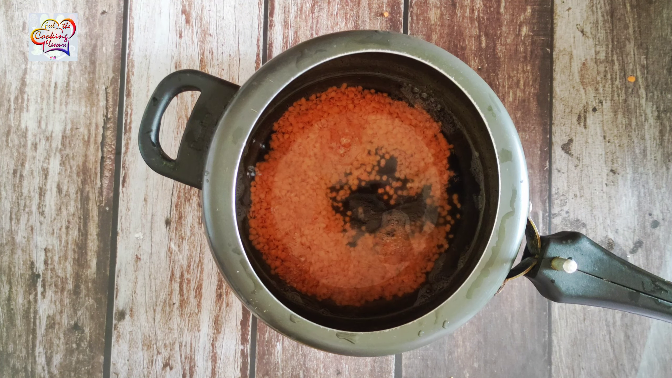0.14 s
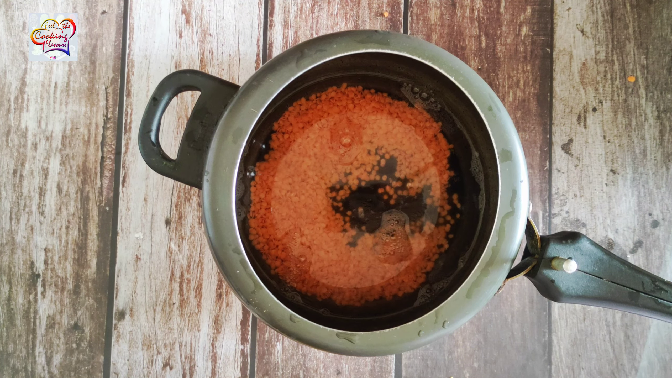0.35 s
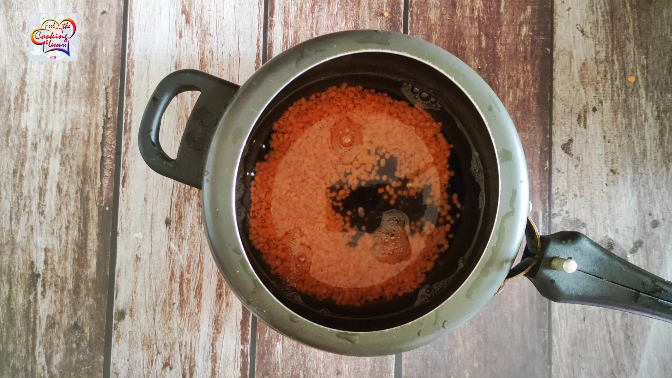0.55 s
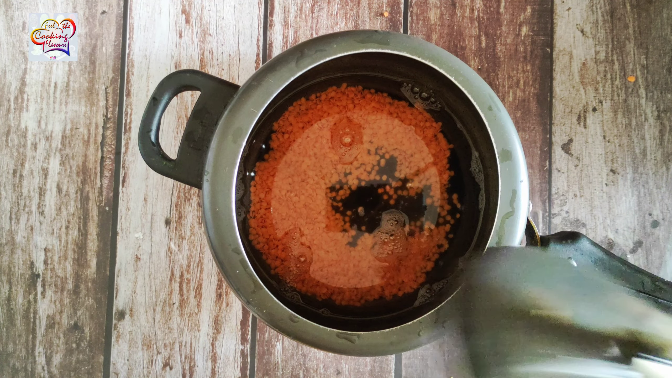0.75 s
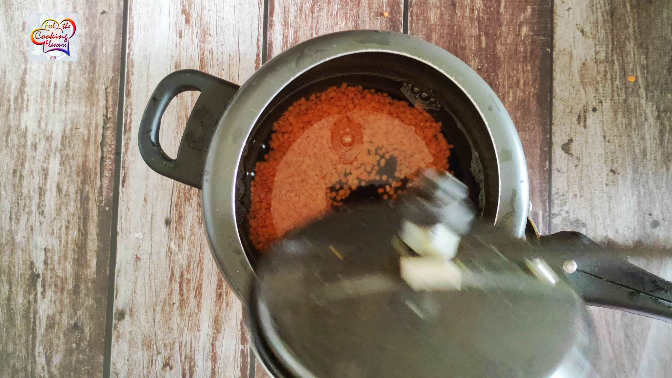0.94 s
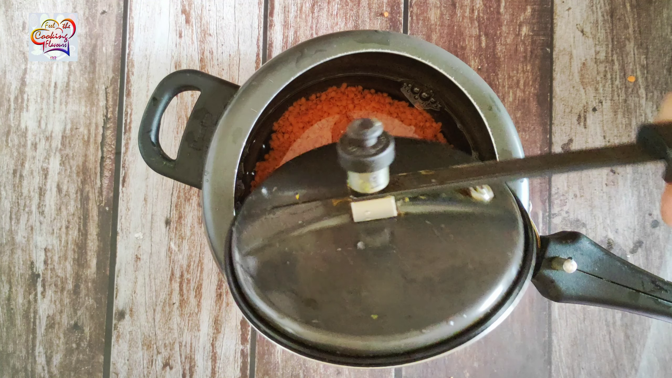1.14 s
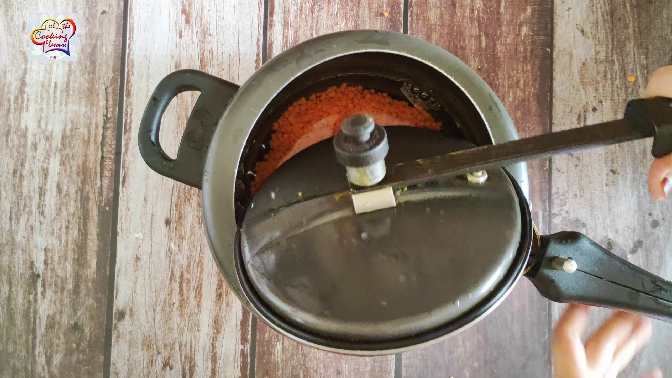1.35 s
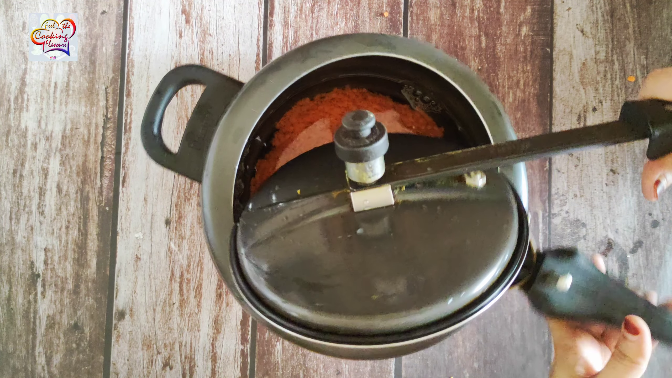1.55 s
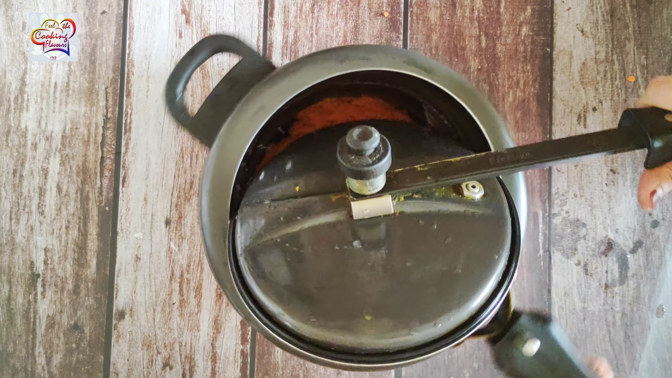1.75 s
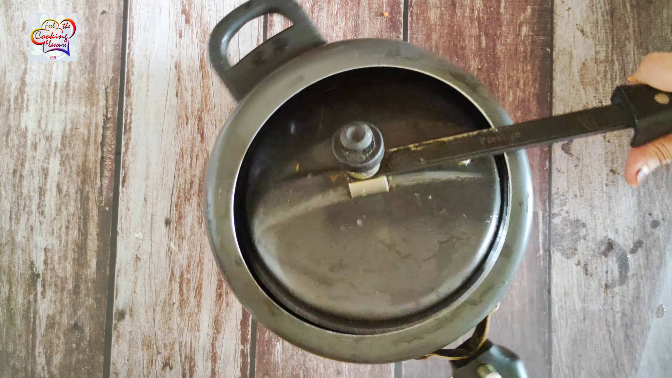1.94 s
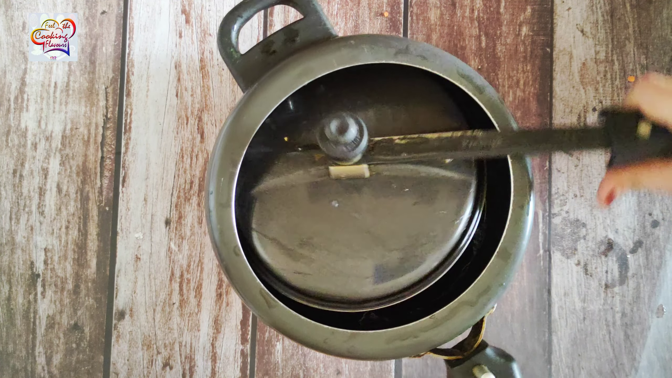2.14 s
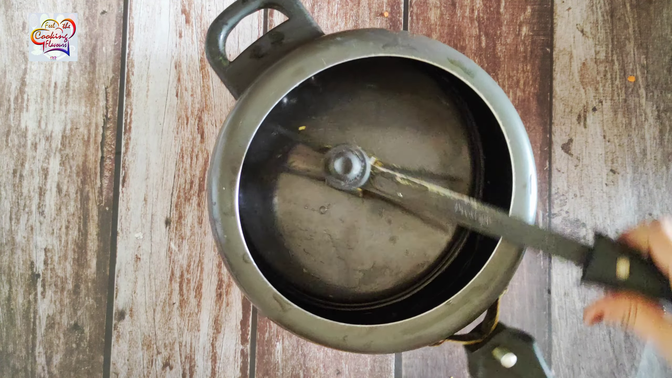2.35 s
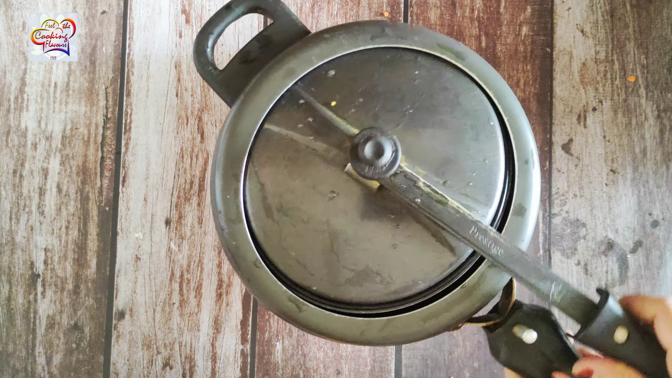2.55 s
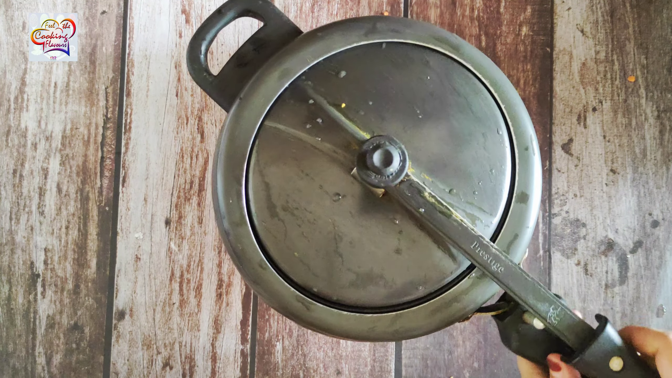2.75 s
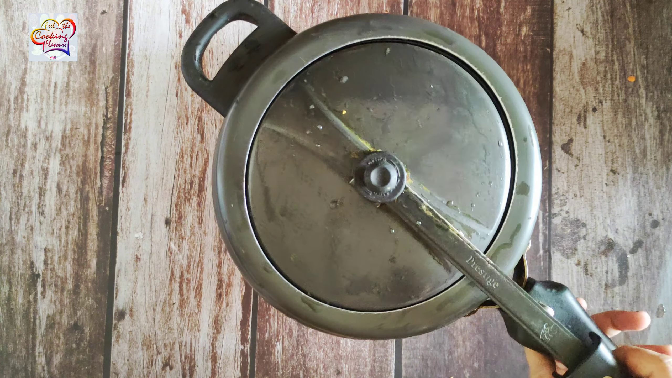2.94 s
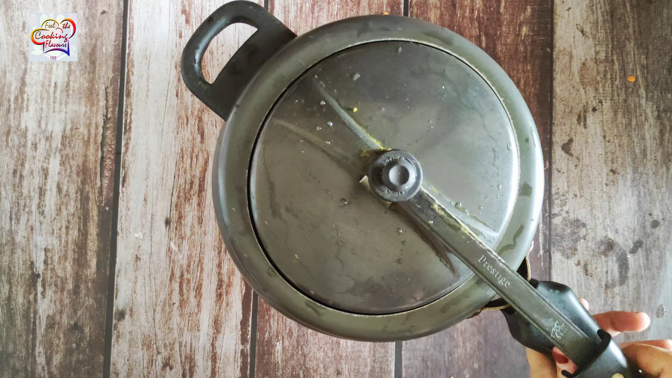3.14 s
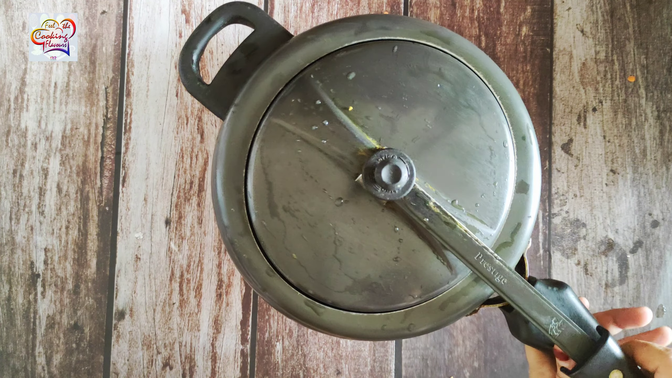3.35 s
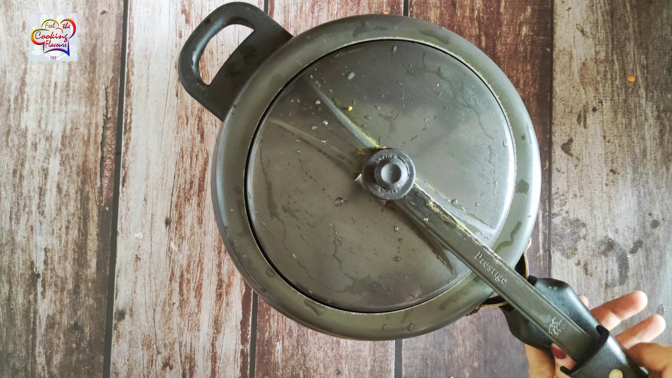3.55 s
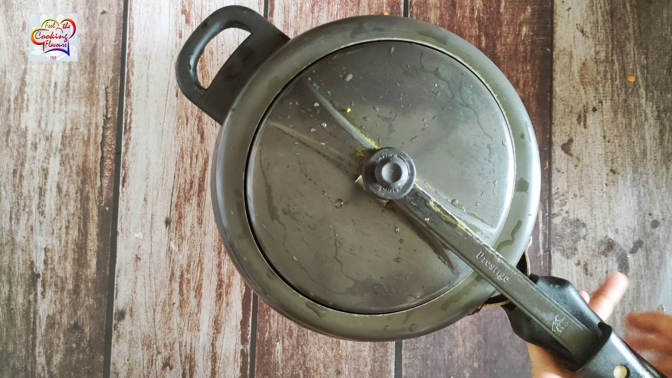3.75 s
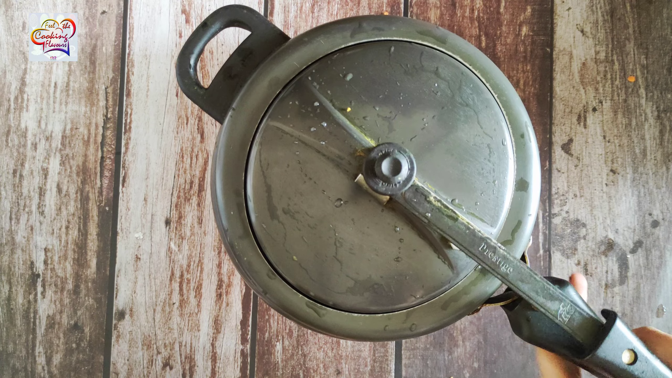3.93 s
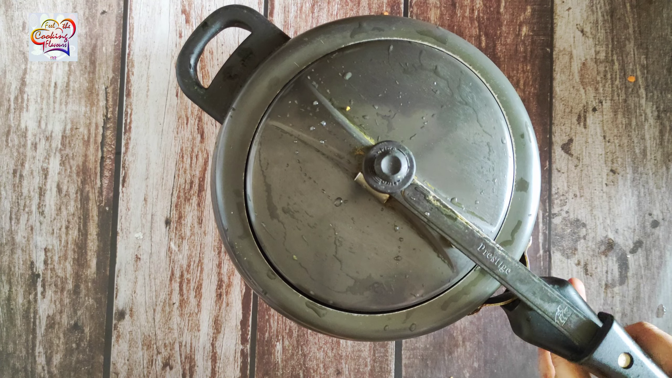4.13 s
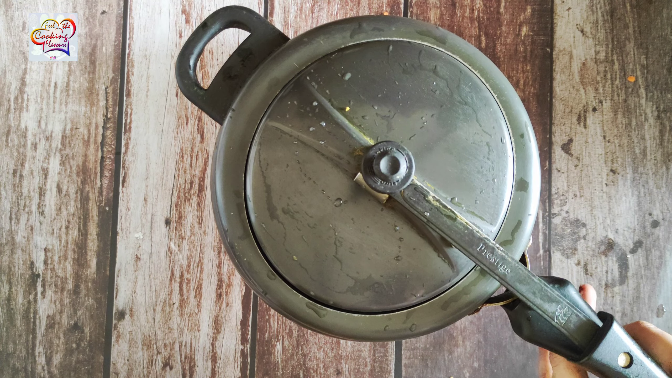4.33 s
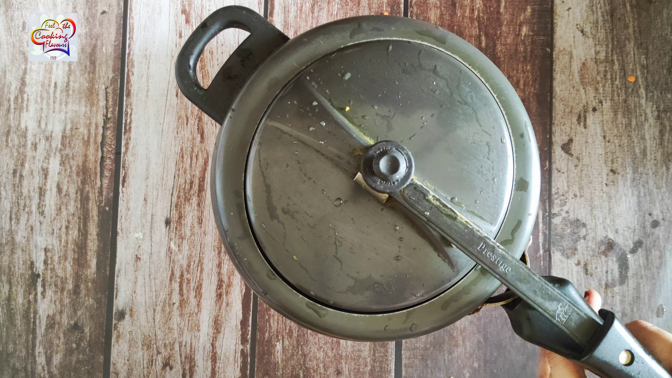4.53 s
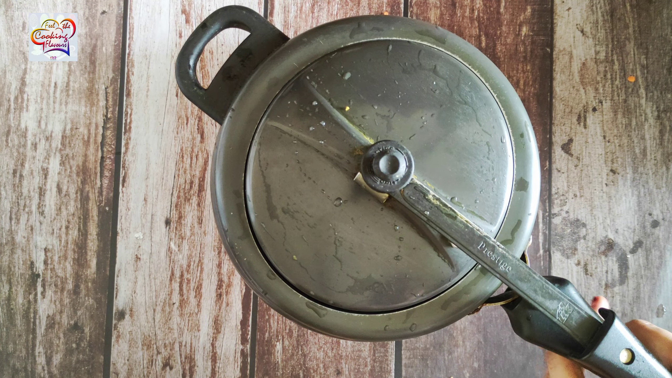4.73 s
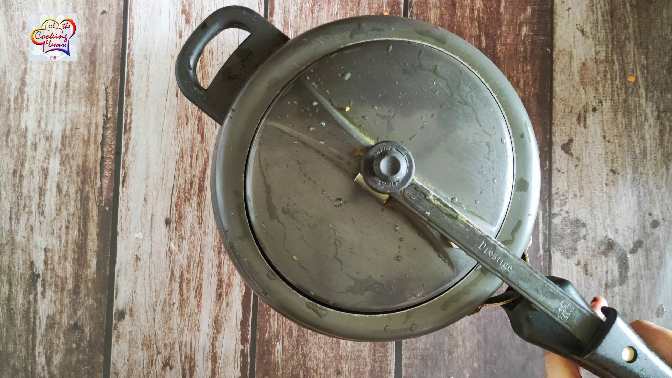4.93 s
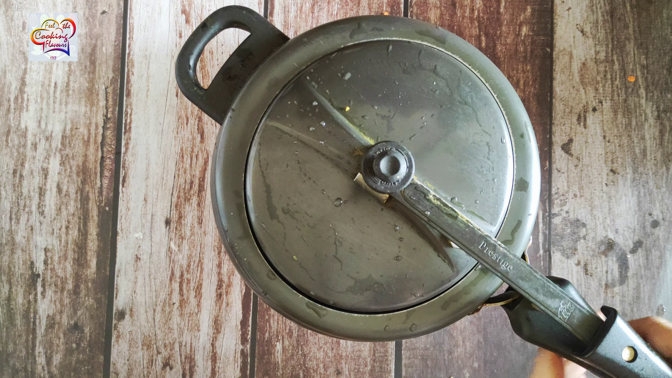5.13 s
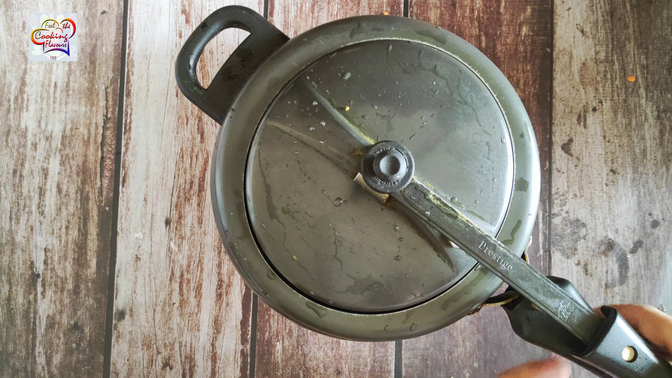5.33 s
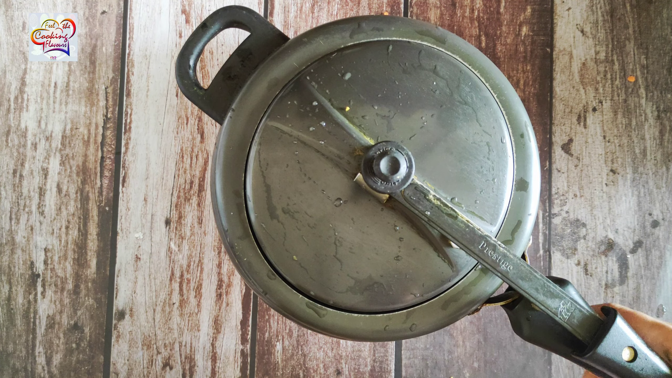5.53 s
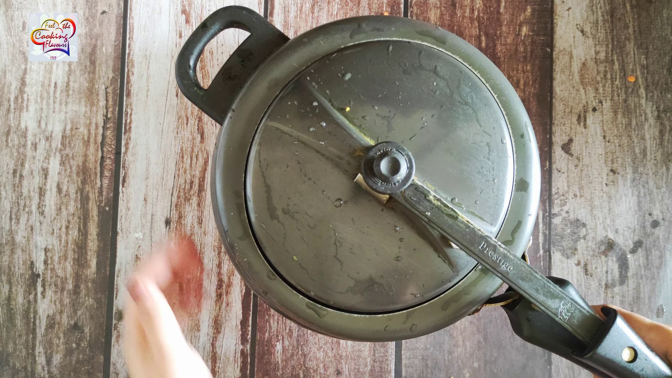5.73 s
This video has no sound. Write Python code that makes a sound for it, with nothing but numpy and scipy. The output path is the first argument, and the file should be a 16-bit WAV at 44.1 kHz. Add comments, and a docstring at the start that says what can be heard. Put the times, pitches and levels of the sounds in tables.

```python
"""In a small kitchen a metal lid is slid into a pressure cooker, turned, pulled up to the rim and latched.
Contacts excite wall and lid resonances, and the air inside booms at a pitch that falls as the gap closes.
Loose parts jingle, friction grains scrape the rim, dry clicks work the handles, low rings bump the table.
Decaying noise echoes answer over a low rumble and faint hiss; the sound is cut briefly near the start,
and dips once later."""
import sys
import numpy as np
from scipy import signal
from scipy.fft import rfft, irfft, next_fast_len
from scipy.io import wavfile
from scipy.ndimage import uniform_filter1d, map_coordinates

SR = 44100
rng = np.random.default_rng(int(sys.argv[2]) if len(sys.argv) > 2 else 0)


def volts(x):
    """Linear amplitude factor 10**(x/20) for a level x in dB, scalar or array-like."""
    e = np.asarray(x, float) / 20
    return 10 ** e


def output_pcm(signal):
    """Save a mono or channel-first signal as 16-bit PCM at the path in sys.argv[1].

    Samples are clipped to [-1, 1] before scaling.
    """
    pcm = np.clip(np.atleast_2d(signal).T, -1, 1) * 32767
    wavfile.write(sys.argv[1], SR, np.round(pcm).astype(np.int16))


N = 259308  # length in samples
SPLIT_HZ = 3990  # bright ticks lie above, duller layers below

# Levels of events and resonances are balances ahead of the layer trims.
# Room rumble colour: [f/Hz, relative gain/dB]
RUMBLE_COLOUR = [(21, -39), (35, -6.5), (54, -1), (70, -17), (156, -1), (191, 0), (210, -12.5), (242, -1.5),
                 (388, -12.5), (548, -12.5), (683, -21.5), (951, -23), (1500, -33), (1950, -46),
                 (3300, -120)]
# Room rumble over time: [t/s, rms level/dB]
RUMBLE_LEVEL = [(0, -61.5), (1, -63.5), (3.5, -59), (4.4, -63.5), (5.3, -61.5), (5.88, -62.5)]
# Faint hiss colour: [f/Hz, relative gain/dB]
HISS_COLOUR = [(710, -51), (1200, -12), (2620, -11.5), (2920, -14.5), (4310, -19), (4550, -13),
               (5020, -19.5), (7330, -7), (9510, -20), (16000, -52.5)]
# Loose parts jingle as the lid is carried: [t/s, blow level/dB, then knock and ring relative to it/dB]
JINGLES = [(0.191, -65.5, -3, -10), (0.4622, -56.5, -27, -3), (0.637, -69, 3, 6), (0.671, -49, 3.4, -3.5),
           (0.756, -66.5, 0, 7), (0.832, -42, -2.5, -27), (0.841, -44.5, -32, -9),
           (0.866, -21.5, -21.5, -11)]
# Resonances of the lid held free: [f/Hz, width/Hz, level/dB]
FREE_LID_MODES = [(2245, 260, -10.5), (2570, 230, 2), (2640, 260, -7), (3570, 93, -3.5), (4680, 180, -16),
                  (5200, 230, -14.5)]
# Click colour of small hard parts: [f/Hz, relative gain/dB]
SNAP_COLOUR = [(2060, -59), (3500, -0.5), (3880, -16), (4680, -19.5), (5570, -11.5), (7600, 2.5),
               (8590, -7.5), (10500, -33), (15700, -30), (16400, -26.5)]
# The pot is turned on the table: [start t/s, hold t/s, level/dB]
DRAGS = [(1.0, 0.02, -65), (1.65, 0.13, -59), (2.15, 0.27, -63)]
# The pot bumps the wooden table: [t/s, ring level before its swell/dB, f/Hz, rumble level after it/dB]
BUMPS = [(1.29, -28, 220, -44), (1.402, -38, 175, -52), (1.712, -31.5, 180, -57), (1.871, -28, 119, -52),
         (1.905, -29, 124, -53), (2.6, -17.5, 250, -41), (2.748, -22, 193, -41), (2.783, -14, 175, -43.5),
         (2.82, -21.5, 148, -60), (2.942, -18, 147, -44.5), (2.987, -31, 169.9, -48),
         (3.138, -33, 171, -46), (3.388, -28.5, 166, -55), (3.537, -41, 148, -67), (3.942, -30, 179, -59),
         (4.79, -35, 114, -78)]
# Resonances of the table top: [f/Hz, width/Hz, level/dB]
TABLE_MODES = [(61.16, 10, -6.5), (139.6, 36.8, 2), (175, 30, 2), (250, 65, -4)]
# Lid on pot: [t/s, blow level/dB, then boom, ring and clack relative to it/dB]
CONTACTS = [(1.284, -34, 4, 9, 1), (1.296, -32.5, -29, 3, -19), (1.3178, -52, 18, 15.5, -22),
            (1.394, -43.5, 8, 12.5, -0.5), (1.708, -56.5, 6, 4, -7), (1.7666, -45, -13, -6, -1),
            (1.7914, -34, -40, -3, -9), (1.8344, -43.5, 0, 3.5, 0), (1.8569, -39.5, 3.5, 6, -3),
            (1.8667, -30.5, -19, -26, -14), (1.9086, -33.5, 1, -14, -2.5), (1.9294, -51.5, -9.5, -25, 6),
            (1.9654, -32.5, -10, -7, -11), (2.139, -35, -14.5, -3, -4), (2.2204, -25.5, -16, -3, -2.5),
            (2.2393, -21, -14, -9, -7), (2.2694, -30.5, -7, -11, -3), (2.3297, -23.5, -14.5, -4.5, -8.5),
            (2.3993, -37.5, -5, 2, 0), (2.4453, -27, -37, -8, -16), (2.4544, -32.5, -6.5, -6, 1.5),
            (2.4894, -38.5, -17, 2, -4.5), (2.5365, -45, -26, 2.5, 4.5), (2.585, -26.5, -6.5, -5, -3.5),
            (2.5994, -27.5, -23, -16, -4), (2.6194, -23.5, -13, -5, -8), (2.6365, -25, -14, -10.5, -2.5),
            (2.6669, -27, -9.5, -4.5, -9), (2.7358, -33, -15, -0.5, -3.5), (2.7539, -31.5, -1, -15, -0.5),
            (2.9809, -28, -7, -0.5, -5), (3.0181, -34, -8, -5, -9), (3.136, -42, -24, 9.5, -4)]
# Resonances of the pot wall: [f/Hz, width/Hz, level/dB]
WALL_MODES = [(546, 51, -7), (592.5, 75, -4.5), (846, 46, -4), (971, 58, 1), (1001, 50, 1)]
# Resonances of lid and rim: [f/Hz, width/Hz, level/dB]
LID_MODES = [(1580, 49, -10), (2034, 36, 1.5), (2910, 37, -1), (3570, 24, 14), (3700, 112, 11),
             (4555, 30, 10.5), (5270, 46, 11), (5200, 50, -9)]
# Colour of the contact crack: [f/Hz, relative gain/dB]
CRACK_COLOUR = [(1760, -43), (3000, -20.5), (3690, -8), (4040, -11.5), (4830, -2.5), (5570, -5.5),
                (7340, 2.5), (8770, -5.5), (10600, -29.5), (14700, -34.5), (16400, -54)]
# Colour of the lid's clack: [f/Hz, relative gain/dB]
CLACK_COLOUR = [(1200, -7.5), (1500, 2), (2100, 1.5), (2600, 1.5), (3100, -5), (3600, 8), (4100, -0.5),
                (4700, 15)]
# Lid tilted in, hanging free, then pulled up: [t/s, air f/Hz, air t60/s, main lid ring f/Hz, its t60/s]
LID_POSITION = [(1.3, 380.7, 0.064, 793.5, 0.11), (1.8, 391, 0.067, 799, 0.083),
                (1.95, 347, .05, 794, 0.07), (2.13, 322.8, 0.26, 765, 0.46), (2.3, 323, 0.3, 771, .13),
                (2.5, 325.7, 0.16, 770.3, 0.099), (2.55, 318.8, 0.054, 769.6, 0.075),
                (2.62, 318.2, 0.095, 768.7, 0.12), (2.68, 253.6, 0.22, 769, 0.22),
                (2.74, 245.3, 0.086, 760, 0.049), (2.8, 228.2, .085, 768, 0.059),
                (3.0, 250, 0.041, 768, 0.06)]
# Rim sliding on rim: [start t/s, rise t/s, hold t/s, scrape level/dB, brightness relative to it/dB]
SLIDES = [(1.637, .13, .19, -46.5, -6), (2.5, 0.084, 0.082, -35.5, -3.5), (2.713, 0.073, 0.014, -39, -2),
          (3.09, 0.036, 0.016, -44.5, -4.5)]
# Small parts of the handles: [t/s, blow level/dB, then knock and clack relative to it/dB]
CLICKS = [(3.1675, -33.5, -45, -7), (3.188, -27, -13.5, -4), (3.533, -60.5, -10, -5),
          (3.647, -53.5, -5.5, -25), (3.743, -64.5, 8.5, -18), (3.9932, -43, -16, -6.5),
          (4.0049, -29.5, -20.5, -14), (4.0511, -35, -13.5, -14), (4.1163, -54, 8, -26),
          (4.139, -36, -12, -15.5), (4.334, -48, -10.5, -31), (4.341, -41, -14.5, -17),
          (4.5444, -39.5, -15.5, -10), (4.781, -20, -19, -16), (4.9352, -37, -16.5, -14.5),
          (5.008, -64, 5, -27)]
# Decay of the kitchen's main echo: [f/Hz, t60/s]
KITCHEN_DECAY = [(150, 0.66), (500, 0.33), (1500, 0.41), (4000, 0.47), (8000, 0.39), (14000, 0.26)]
# Strength of the kitchen's answer: [f/Hz, gain/dB]
ECHO_COLOUR = [(100, -12.5), (400, 1.5), (1200, -2), (4000, -1.5), (9000, -1.5)]


def unit(x):
    """Bring a signal to rms 1."""
    return x / np.sqrt(np.mean(x ** 2) + 1e-20)


def along(points, hz):
    """Read a (frequency, value) curve on a log frequency axis."""
    f, v = np.transpose(points)
    return np.interp(np.log(hz + 1), np.log(f + 1), v)


def curves(rows):
    """Give one value per sample for each column after the time."""
    s, *cols = np.transpose(rows)
    return [np.interp(np.arange(N) / SR, s, c) for c in cols]


def filtered(x, response):
    """Shape a sound's spectrum by a complex response of frequency."""
    m = 2 * next_fast_len(N // 2 + SR // 4)
    return irfft(rfft(x, m) * response(np.fft.rfftfreq(m, 1 / SR)), m)[..., :N]


def causal(gain):
    """Turn a gain curve into a minimum-phase response of unit energy, so nothing sounds ahead of its blow."""
    cep = irfft(np.log(gain + 1e-6))
    # fold the cepstrum onto positive time
    cep[1:len(cep) // 2] *= 2
    cep[len(cep) // 2 + 1:] = 0
    response = np.exp(rfft(cep))
    return response / np.sqrt(np.mean(np.abs(response) ** 2))


def modes(table, hz):
    """Sum damped resonances of alternating sign into a response of unit energy."""
    total = 0
    for k, (centre, width, db) in enumerate(table):
        damping = 1j * hz * width
        total = total + (-1) ** k * volts(db) * damping / (centre * centre - hz * hz + damping)
    return total / np.sqrt(np.mean(np.abs(total) ** 2))


def chatter(length, rise, spike):
    """A contact force of set energy: a first blow, then a rattle that swells fast and dies away (times in s)."""
    t = np.arange(SR // 10) / SR
    shape = np.exp(-t / length) * (1 - np.exp(-t / rise))
    force = rng.standard_normal(len(t)) * shape
    force *= np.linalg.norm(shape) / np.linalg.norm(force)
    force[int(rise * SR)] += spike
    return force


def clack(force, hz, width):
    """The struck spot favours its own pitch: one resonance, its width a fraction of that pitch."""
    b, a = signal.iirpeak(hz, 1 / width, SR)
    return signal.lfilter(b, a, force) / np.sqrt(width * hz / SR)


def spot(hz):
    """Each blow lands on another spot, with another pitch."""
    return hz * np.exp(np.clip(0.21 * rng.standard_normal(), -.7, .7))


def snap(force):
    """The bright tick of a small hard part: its colour, kept above the split."""
    return filtered(force, lambda hz: causal(volts(along(SNAP_COLOUR, hz)) / (1 + (SPLIT_HZ / (hz + 1)) ** 8)))


def stroke(start, hold, db, rise, t60):
    """Gain of one movement: a smooth rise, a hold, a dying release (times in s)."""
    t = np.arange(N) / SR - start
    release = volts(db - 60 * np.clip(t - rise - hold, 0, 2) / t60)
    return release * np.clip(t / rise, 0, 1) ** 2


def room_noise():
    """Low rumble whose noise is slightly patchy in time and pitch, and a faint smooth hiss."""
    z = signal.stft(rng.standard_normal(N), nperseg=1024)[2]
    patches = uniform_filter1d(uniform_filter1d(rng.standard_normal(z.shape), 6, 0), 8, 1)
    noise = signal.istft(z * volts(2.1 * unit(patches)), nperseg=1024)[1][:N]
    level_db, = curves(RUMBLE_LEVEL)
    rumble = unit(filtered(noise, lambda hz: volts(along(RUMBLE_COLOUR, hz)) * (hz < 2500)))
    white = rng.standard_normal(N)
    hiss = unit(filtered(white, lambda hz: volts(along(HISS_COLOUR, hz)) * (hz > 700)))
    return volts(level_db) * rumble + volts(-79) * hiss


def jingles():
    """Each jingle of a loose part knocks dully, rings the free lid's resonances and ticks."""
    knock, ring, tick = np.zeros((3, N + SR))
    for s, db, knock_db, ring_db in JINGLES:
        force = volts(db) * chatter(length=0.0026, rise=0.0004, spike=2.6)
        span = slice(round(s * SR), round(s * SR) + len(force))
        knock[span] += volts(knock_db) * clack(force, 1120, width=0.65)
        ring[span] += volts(ring_db) * force
        tick[span] += force
    free_lid = filtered(ring[:N], lambda hz: modes(FREE_LID_MODES, hz))
    free_lid = free_lid + 0.23 * clack(ring[:N], 2700, width=0.85)
    return volts(-6.0) * knock[:N] + volts(1.0) * free_lid + volts(-7.5) * snap(tick[:N])


def table():
    """Bumps are short low sines that leave a rumble in the top; it also rumbles as the pot is dragged round."""
    bumps, t = np.zeros(N + SR), np.arange(SR // 2) / SR
    swell = 1 - np.exp(-(t / 0.01) ** 2)
    for s, db, hz, _ in BUMPS:
        ring = volts(db - 60 * t / 0.056) * swell * np.sin(2 * np.pi * hz * t)  # t60 0.056 s
        bumps[round(s * SR):][:len(t)] += ring
    stir = sum(stroke(s, 0, db, rise=0.021, t60=0.37) for s, _, _, db in BUMPS)
    stir = stir + sum(stroke(*row, rise=0.083, t60=0.82) for row in DRAGS)
    rumble = unit(filtered(rng.standard_normal(N), lambda hz: modes(TABLE_MODES, hz)))
    return bumps[:N] + stir * rumble


def contacts():
    """Forces of the lid meeting the pot, in rows: single pushes for boom and bell, rattles for ring, clack, tick."""
    rows = np.zeros((5, N + SR))
    for s, db, boom_db, ring_db, clack_db in CONTACTS:
        start = round(s * SR)
        force = chatter(length=0.0057, rise=0.00055, spike=2.1)
        pitched = clack(force, spot(2060), width=0.64) + 1.72 * force
        levels = volts(db + np.c_[[ring_db, clack_db, 0]])
        rows[2:, start:start + len(force)] += levels * [force, pitched, force]
        rows[:2, start] += volts(db + np.array([boom_db, ring_db]))
    return rows[:, :N]


def scrape():
    """Rim friction, rows as for contacts: uneven grains under each slide, sparse hard ticks scattered at random."""
    gains = [stroke(s, hold, db, rise, t60=0.29) for s, rise, hold, db, _ in SLIDES]
    size = volts(3 * np.minimum(rng.exponential(size=N), 3))
    grains = rng.standard_normal(N) * size * (rng.random(N) < .08)
    hard_ticks = 14 * rng.standard_normal(N) * (rng.random(N) < 90 / SR)  # about 90 a second
    grains = unit(grains) + hard_ticks
    # the scrape's level wavers slowly at random
    waver = map_coordinates(rng.standard_normal(N // 400 + 4), [np.arange(N) / 400])
    grains = unit(grains * volts(2.5 * waver))
    rub = sum(gains) * grains
    bright = sum(gain * volts(row[4]) for gain, row in zip(gains, SLIDES)) * grains
    body = volts(4) * rub
    return np.array([volts(-33.5) * body, volts(-30.5) * body, volts(-14) * body, volts(1.1) * rub, volts(-4) * bright])


def swing(force, hz, t60):
    """One resonance of moving pitch and damping: every push adds to its swing, which then decays."""
    step = 16  # samples per update
    push = force[:N // step * step].reshape(-1, step).sum(1)
    keep = volts(-60 * step / SR / np.clip(t60[::step], .02, 2))
    size = np.zeros(len(push))
    for i in range(1, len(push)):
        size[i] = keep[i] * size[i - 1] + push[i]
    size = uniform_filter1d(size, size=9, origin=4)  # it takes about a cycle to build up
    size = np.interp(np.arange(N), np.arange(len(size)) * step, size)
    return size * np.sin(2 * np.pi * np.cumsum(hz) / SR)


def pot():
    """Return tones (enclosed air and bell) and cracks (wall and lid modes under broad clacks and ticks)."""
    boom, bell, ring, mid, tick = contacts() + scrape()
    air_hz, air_t60, bell_hz, bell_t60 = curves(LID_POSITION)

    def low(hz):
        """Low-pass gain at the split."""
        return 1 / (1 + (hz / SPLIT_HZ) ** 8)

    def wall_response(hz):
        """Wall modes over a broad band of about 330 to 1490 Hz."""
        return modes(WALL_MODES, hz) + 0.59 * causal(low(hz * 2.686) * (1 - low(hz * 12)))

    def clack_response(hz):
        """Clack colour from about 1000 Hz up to the split."""
        return causal(volts(along(CLACK_COLOUR, hz)) * low(hz) * (1 - low(hz * 4)))

    wall = volts(-3.5) * filtered(ring, wall_response)
    mids = volts(-15.5) * filtered(mid, clack_response)
    tops = volts(-5.5) * filtered(tick, lambda hz: causal(volts(along(CRACK_COLOUR, hz)) * (1 - low(hz))))
    lid = volts(-22.5) * filtered(mid + 0.25 * tick, lambda hz: modes(LID_MODES, hz))
    tones = swing(boom, air_hz, air_t60) + volts(-8) * swing(bell, bell_hz, bell_t60)
    return tones, wall + mids + tops + lid


def handles():
    """Dry clicks of dull knock, pitched clack and bright tick, with no long ring; then a brush of the hand."""
    low, top = np.zeros((2, N + SR))
    for s, db, knock_db, clack_db in CLICKS:
        force = volts(db) * chatter(length=0.0036, rise=0.00071, spike=3.9)
        span = slice(round(s * SR), round(s * SR) + len(force))
        pitched = clack(force, spot(2520), width=0.2) + 0.71 * clack(force, 2090, width=0.3)
        low[span] += volts(knock_db - 4.0) * clack(force, 880, width=0.54)
        low[span] += volts(clack_db - 11.5) * pitched
        top[span] += force
    skin = unit(clack(rng.standard_normal(N), 1630, width=0.11))
    brush = stroke(5.825, hold=0, db=-70.5, rise=0.025, t60=.3) * skin
    return low[:N] + volts(-5.0) * snap(top[:N]) + brush


def kitchen(x):
    """Quick nearby echoes, then each frequency dies at its own speed, in random noise tails."""
    out, hop = np.zeros(N + 2 * SR), SR // 8  # a new random echo pattern is drawn every eighth of a second
    for start in range(0, N, hop):
        hz, t, z = signal.stft(rng.standard_normal(SR // 2), SR, nperseg=256)
        room = volts(-60 * t / along(KITCHEN_DECAY, hz)[:, None])
        nearby = 0.4 * volts(-60 * t / 0.059)  # t60 0.059 s
        tail = signal.istft(z * (room + nearby), SR, nperseg=256)[1]
        answer = signal.fftconvolve(x[start:start + hop], tail / np.linalg.norm(tail))
        out[start + 130:][:len(answer)] += answer  # first echo about 3 ms late
    return out[:N]


def level_cut():
    """Gain of a quick fade out, silence, a fade in with a quick and a slow part, and one brief dip later."""
    cut_s, fade_s, back_s = 0.059, 0.012, 0.13
    dip_s, dip_length_s, dip_db = 2.6125, 0.0081, -9
    slow_share = 0.78
    t = np.arange(N) / SR
    after = np.clip(t - back_s, 0, None)
    back = 1 - slow_share * np.exp(-after / 0.14) - (1 - slow_share) * np.exp(-after / 0.012)
    in_dip = 1. * (abs(t - dip_s - dip_length_s / 2) < dip_length_s / 2)
    dip = volts(dip_db * uniform_filter1d(in_dip, size=40))
    return np.clip((cut_s - t) / fade_s, 0, 1) ** 2 + back * dip


def scene():
    """Mix pot, lid, handles and table with their echo and the room noise."""
    tones, cracks = pot()
    wood = table()
    near = cracks + jingles() + handles()
    # low tones and bumps are heard close by and stir the room little
    echo = kitchen(near + volts(-5) * tones + volts(-6.0) * wood)
    echo = filtered(echo, lambda hz: volts(along(ECHO_COLOUR, hz)))
    return (near + tones + wood + echo + room_noise())[None]


def roll_off(x):
    """The treble ends steeply here."""
    return signal.sosfilt(signal.butter(12, 16000, fs=SR, output="sos"), x)


def record(dry):
    """Apply the brief cut and the later dip to the mix."""
    finished = dry * level_cut()
    return roll_off(finished)


dry = scene()
out = record(dry)
output_pcm(out)
```